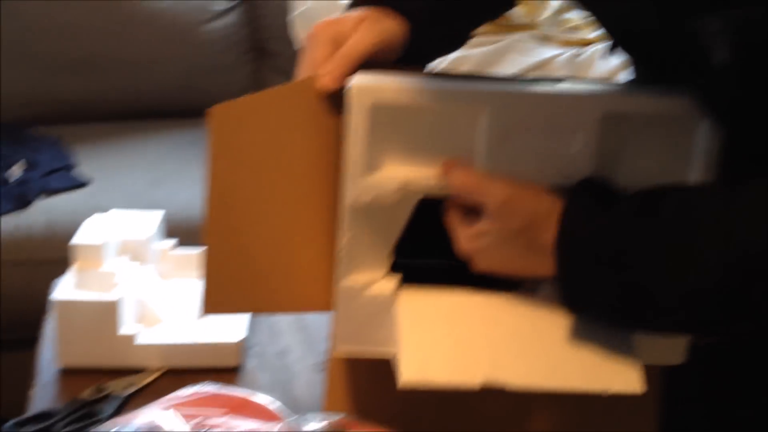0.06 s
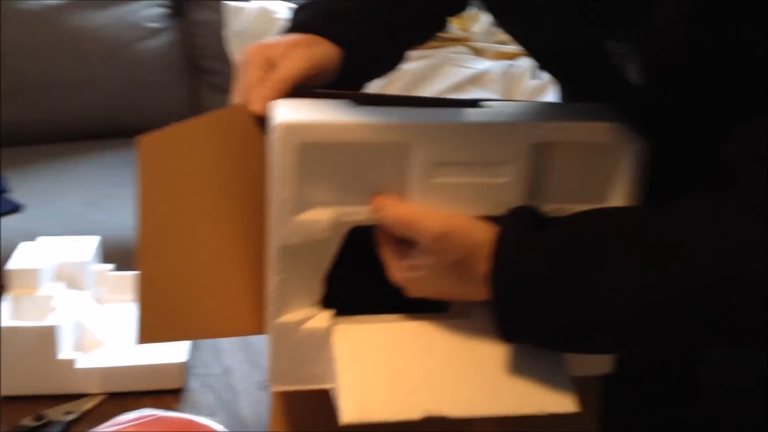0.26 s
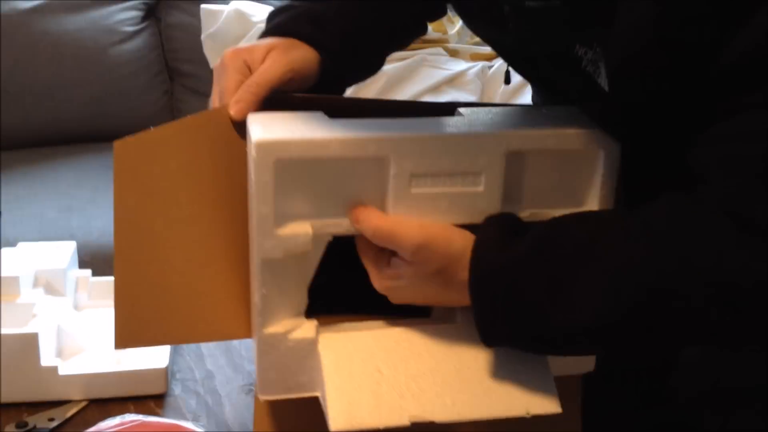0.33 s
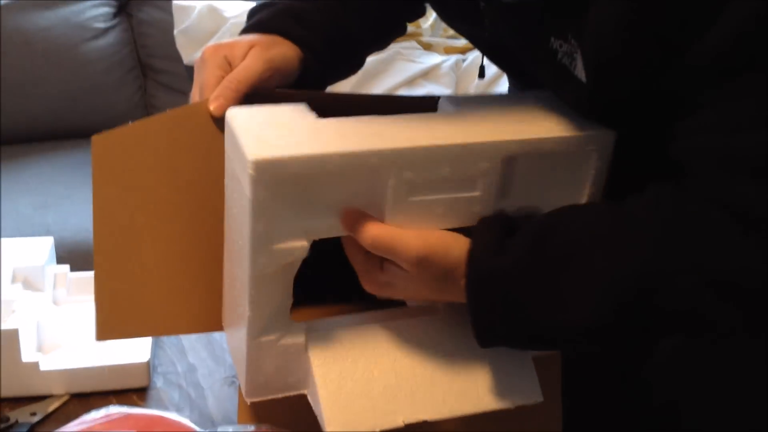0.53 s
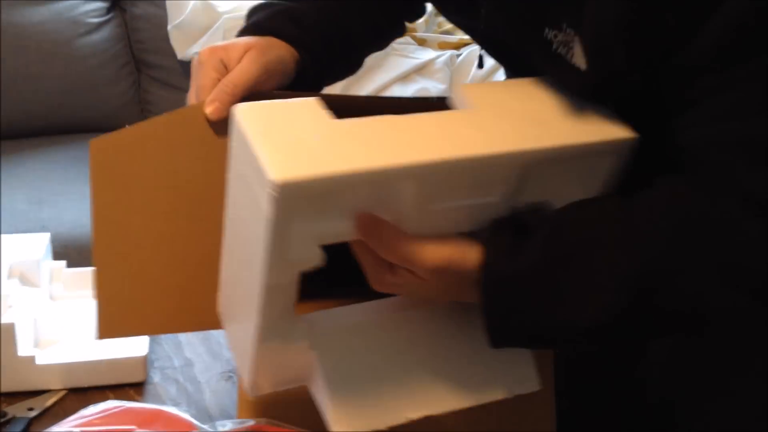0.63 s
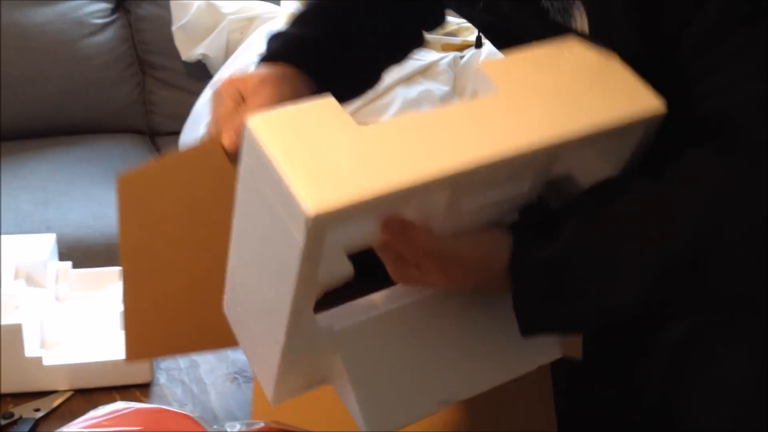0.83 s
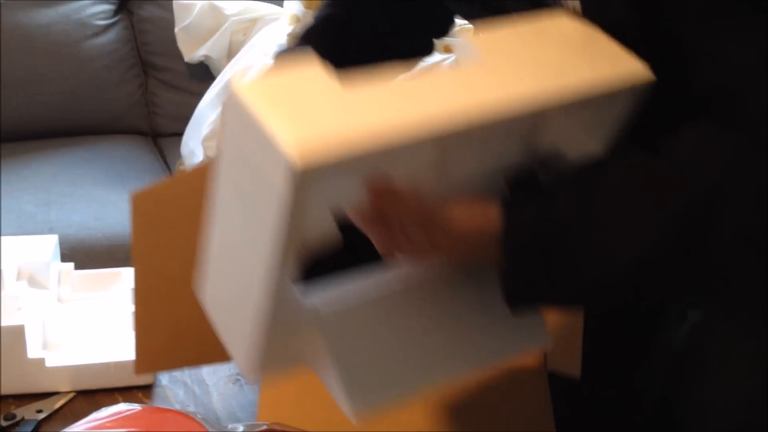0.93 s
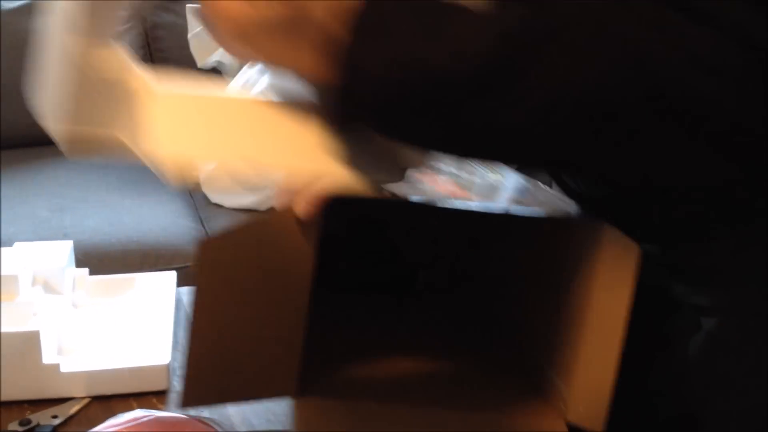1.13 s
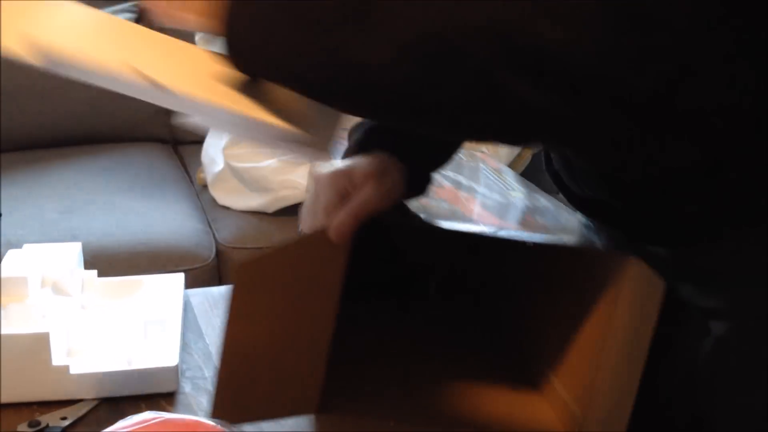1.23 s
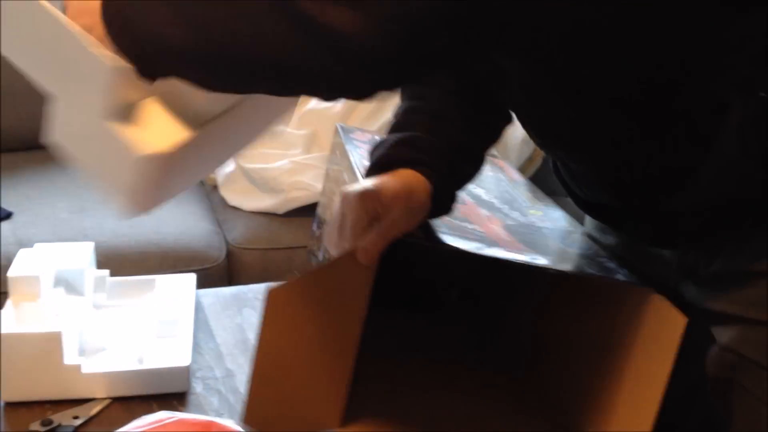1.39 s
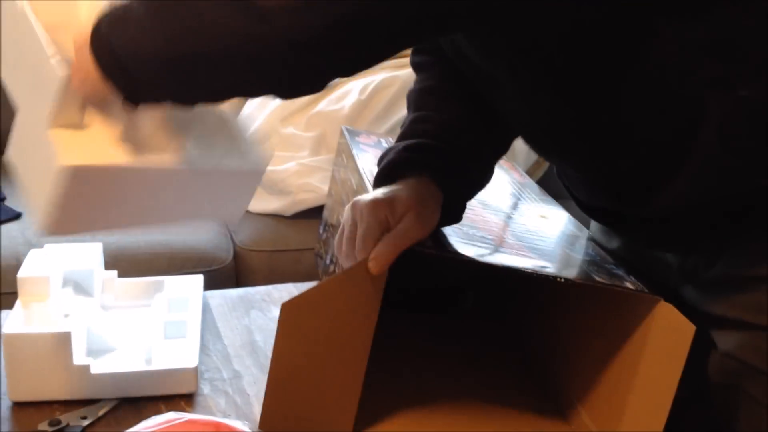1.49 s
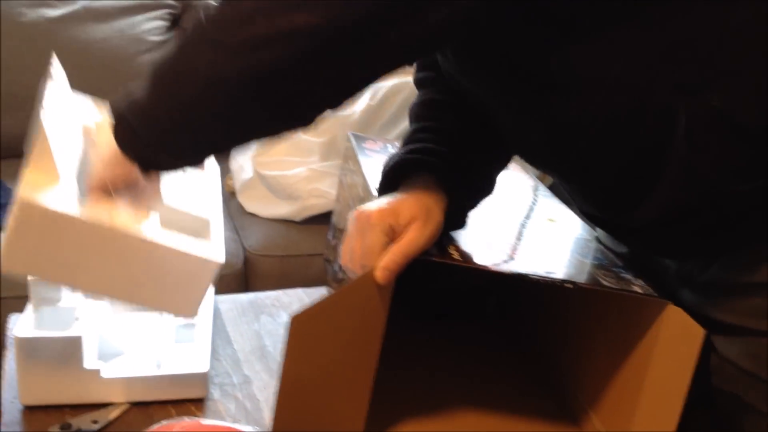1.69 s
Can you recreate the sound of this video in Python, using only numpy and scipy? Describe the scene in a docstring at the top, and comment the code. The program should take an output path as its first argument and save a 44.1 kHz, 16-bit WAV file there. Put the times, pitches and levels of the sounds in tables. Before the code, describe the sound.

Hollow knocks of moulded foam against a cardboard box: a brief soft rub, a sudden loud clack, a rapid uneven cluster, another strong knock, then faint scraping and light bumps, close in a furnished living room.

```python
"""Living room, close microphone: a moulded foam insert is worked out of a cardboard box.
It sticks and jerks free in hollow knocks, each a panel thump with box ring, a clack and a foam crack.
Between them foam slides on cardboard: grainy filtered noise, a fine hiss over a low rasp.
At the end the emptied box bumps twice. The knocks also excite a diffuse room tail."""
import sys
import numpy as np
from scipy import signal
from scipy.io import wavfile

SR = 44100
rng = np.random.default_rng(int(sys.argv[2]) if len(sys.argv) > 2 else 0)


def digitize_waveform(pressure):
    """Quantize a signal to 16-bit integers and store it at the path in sys.argv[1].

    Rows of a 2-D input are taken as channels; values are limited to [-1, 1].
    """
    field = np.atleast_2d(pressure).T
    bounded = np.clip(field, -1, 1)
    quanta = np.round(bounded * 32767).astype(np.int16)
    wavfile.write(sys.argv[1], SR, quanta)


N = 77175
T = np.arange(N) / SR

# Hiss of foam sliding on cardboard: time_s, level_db
HISS_LEVEL = [(0, -34.5), (.06, -37), (.085, -46), (.125, -48.5), (.17, -45.5), (.23, -52), (.46, -53.5),
              (.54, -45), (.605, -43.5), (.7, -51), (.79, -50), (.87, -45.5), (.91, -48.5), (1.02, -41.5),
              (1.075, -58.5), (1.11, -43.5), (1.24, -46.5), (1.31, -48), (1.345, -42), (1.40, -46),
              (1.48, -64), (1.62, -57), (1.665, -50.5), (1.72, -67.5), (1.75, -57)]
# Hiss spectrum: freq_hz, density_db_per_hz
HISS_SPECTRUM = [(1500, -4), (2500, -1), (3800, -9.5), (5500, -1), (7300, 1), (10000, -6), (12500, -3),
                 (14500, 2.5), (16000, -16.5)]
# Low rasp of the rubbed cardboard: time_s, level_db
RASP_LEVEL = [(0, -37.5), (.06, -48.5), (.11, -47), (.22, -48), (.45, -44), (.61, -37), (.75, -50),
              (.89, -49.5), (1.02, -46), (1.08, -52.5), (1.18, -48.5), (1.25, -51), (1.29, -41),
              (1.315, -55), (1.335, -39.5), (1.375, -43), (1.39, -34.5), (1.49, -48), (1.6, -45.5),
              (1.68, -47), (1.75, -52.5)]
# Rasp spectrum: freq_hz, density_db_per_hz
RASP_SPECTRUM = [(60, -56), (130, -5), (200, -5), (280, 7.5), (400, 5), (520, -7.5), (800, -1.5),
                 (2200, 0.5), (3300, -10), (6000, -18.5), (15000, -38)]
# Knocks: start_s, thump_db, thump_pitch_hz, thump_t60_s, box_ring_db, clack_db, wall_ring_hz, crack_db
KNOCKS = [ (0.157, -26.5, 229.5, 0.19, -35, -36.5, 710, -54),
          (0.174, -60, 239, 0.11, -32.5, -32, 1200, -61), (0.223, -43, 234, .1, -32.5, -39.5, 700, -71),
          (0.2396, -2.5, 245.2, 0.12, -17.5, -12, 1772, -15.5),
          (0.264, -11, 282.5, 0.16, -26.5, -16.5, 1440, -26.5),
          (0.274, -17, 129, .15, -30, -20.5, 1023, -32), (0.3474, -22, 301.3, 0.26, -39, -21.5, 792, -39),
          (0.358, -23.5, 270, 0.12, -26.5, -32.5, 670, -61), (0.395, -8, 261.7, 0.11, -26, -17.5, 583, -23),
          (0.416, -14.5, 387, 0.19, -20.5, -18.5, 756, -27.5),
          (0.436, -10, 279.3, 0.19, -29, -27.5, 830, -32), (0.485, -17, 287, 0.19, -41, -31.5, 1087, -41),
          (0.495, -19, 405.4, 0.08, -49, -27.5, 865, -46), (0.503, -18, 265, 0.13, -24, -35, 510, -52),
          (0.623, -17, 302, 0.12, -46, -30, 1100, -54), (0.635, -8, 306, 0.19, -17.5, -17, 1144, -18),
          (1.043, -26, 295, 0.11, -48.5, -35.5, 1140, -49), (1.196, -73, 266, 0.083, -67, -42, 825, -37.5),
          (1.289, -41.5, 422, 0.2, -68, -48, 1460, -58), (1.325, -40.5, 416, 0.31, -61, -46, 1510, -52),
          (1.412, -20, 191, 0.19, -30.5, -24, 882, -45), (1.427, -22, 293.3, 0.28, -54, -29, 765, -54),
          (1.462, -49, 280, 0.4, -36, -34.5, 2380, -43),
          (1.524, -27.5, 184.6, 0.091, -38.5, -31.5, 920, -64),
          (1.551, -23, 238.4, 0.15, -39.5, -36.5, 770, -70)]
# Ringing modes of box and insert: freq_hz, level_db, t60_s
BOX_MODES = [(117, -17.5, 0.15), (158.2, -22, 0.62), (186.6, -4.5, 0.27), (240.6, 0.5, 0.33),
             (279.1, 1.5, 0.27), (329, -2.5, 0.17), (392, -2.5, 0.19), (489.8, -14, 0.34), (737, -16, .13),
             (847, -27, 0.1), (1075, -16, 0.23), (1420, -21, .17), (1810, -13, 0.056)]
# Clack, dense panel modes: freq_hz, density_db_per_hz
CLACK_SPECTRUM = [(60, -30), (150, 4), (300, 13.5), (550, 3), (850, 7), (1400, -1), (2300, -0.5),
                  (3200, -17.5), (5000, -17.5), (15000, -44)]
# Crack, snap of the foam beads: freq_hz, density_db_per_hz
CRACK_SPECTRUM = [(100, -35), (500, -5), (2000, 15), (4000, 2.5), (6500, 4.5), (9000, -0.5), (12000, -9),
                  (15000, -6)]
# Room decay: freq_hz, t60_s
ROOM_T60 = [(100, 0.5), (300, .42), (800, 0.49), (2000, 0.2), (5000, 0.25), (12000, 0.12)]
# Room tail colour: freq_hz, level_db
ROOM_COLOUR = [(100, 2), (300, -5.5), (800, 0), (2000, 0.5), (5000, -1.5), (12000, -17)]

HISS_PATCHY_DB, HISS_GRAINS_PER_S, HISS_SMOOTH_SHARE = 1.8, 3400, 0.37
RASP_PATCHY_DB, RASP_GRAINS_PER_S, RASP_SMOOTH_SHARE = -0.5, 770, 0.48
PATCH_RATE_HZ, GRAIN_SPREAD_DB = 14, 2
THUMP_RISE_S, THUMP_LAG_S = 0.0013, 0.0012
PUFF_DB, PUFF_HZ, PUFF_T60_S = -9, 46.4, 0.042  # air pushed out of the box; dB re thump
CLACK_T60_S, CRACK_T60_S, CONTACT_RISE_S = 0.11, 0.073, 0.000071
SNAP_DB, SNAP_T60_S = -10, 0.0085  # extra bite at first touch; dB re burst
WALL_DB, WALL_T60_S = -1, 0.045  # struck patch of wall; dB re clack
ROOM_DB, ROOM_DELAY_S, ROOM_BUILD_S = -7.5, 0.0046, 0.0073
MIC_LOW_CUT_HZ, MIC_HIGH_CUT_HZ = 135, 15300

BAND_EDGES_HZ = np.geomspace(45, 17000, 25)
BAND_FILTERS = [
    (np.sqrt(low * high), signal.butter(2, [low, high], "band", fs=SR, output="sos"))
    for low, high in zip(BAND_EDGES_HZ, BAND_EDGES_HZ[1:])]


def from_db(db):
    """Decibels to gain."""
    return 10 ** (np.asarray(db) / 20)


def rms_one(x):
    """Scale to unit rms."""
    return x / np.sqrt(np.mean(x ** 2) + 1e-20)


def level(curve):
    """Gain per sample from (time_s, level_db) points."""
    return from_db(np.interp(T, *np.transpose(curve)))


def at_hz(points, hz):
    """Interpolate a table on a log-frequency axis."""
    freq_hz, value = np.transpose(points)
    return np.interp(np.log(hz), np.log(freq_hz), value)


def fade(t, t60_s):
    """Exponential decay, -60 dB at t60_s."""
    return np.exp(-np.log(1000) * t / t60_s)


def bands(draw):
    """Bands about a third octave wide, each from a fresh noise: (centre_hz, signal)."""
    for hz, sos in BAND_FILTERS:
        yield hz, signal.sosfilt(sos, draw())


def drift(rate_hz):
    """Slow random wander, rms 1: noise through a double real pole."""
    pole = np.exp(-2 * np.pi * rate_hz / SR)
    noise = rng.standard_normal(2 * N)
    wander = signal.lfilter([1], [1, -2 * pole, pole * pole], noise)
    return rms_one(wander[N:])  # settled half only


def friction(spectrum, patchy_db, grains_per_s, smooth_share):
    """Tiny slips of beads on a smooth hiss; the colour wanders as the contact moves; rms 1."""
    sizes = from_db(GRAIN_SPREAD_DB * np.minimum(rng.exponential(1, N), 5))
    slips = rms_one(sizes * (rng.random(N) < grains_per_s / SR))
    force = np.sqrt(smooth_share + (1 - smooth_share) * slips ** 2)  # shares of power
    total = np.zeros(N)
    for hz, band in bands(lambda: force * rng.standard_normal(N)):
        band_db = at_hz(spectrum, hz) + patchy_db * drift(PATCH_RATE_HZ)
        total += band * from_db(band_db)
    return rms_one(total)


def rubbing():
    """Sliding foam hisses; the cardboard rasps under it."""
    hiss = friction(HISS_SPECTRUM, HISS_PATCHY_DB, HISS_GRAINS_PER_S, HISS_SMOOTH_SHARE)
    rasp = friction(RASP_SPECTRUM, RASP_PATCHY_DB, RASP_GRAINS_PER_S, RASP_SMOOTH_SHARE)
    return level(HISS_LEVEL) * hiss + level(RASP_LEVEL) * rasp


def add(out, start_s, sound):
    """Mix a sound in at start_s, cut at the end of the scene."""
    start = int(start_s * SR)
    out[start:start + len(sound)] += sound[:N - start]


def ring(t, hz, t60_s):
    """One struck mode: decaying sine."""
    return np.sin(2 * np.pi * hz * t) * fade(t, t60_s)


def burst(t, spectrum, t60_s):
    """Countless close modes struck together: decaying noise, each band with its set share of energy."""
    shape = fade(t, t60_s) + from_db(SNAP_DB) * fade(t, SNAP_T60_S)
    shape = shape * (1 - np.exp(-t / CONTACT_RISE_S))
    total = np.zeros(len(t))
    for hz, band in bands(lambda: shape * rng.standard_normal(len(t))):
        # sqrt(hz): bandwidth grows with frequency, table is per Hz
        total += rms_one(band) * np.sqrt(hz) * from_db(at_hz(spectrum, hz))
    return rms_one(total) * np.sqrt(np.mean(shape ** 2))


def knocks():
    """Each jerk flexes a panel at its own pitch, rings the box and cracks the foam at the contact."""
    out = np.zeros(N)
    t = T[:SR // 8]
    late = np.maximum(T[:SR // 2] - THUMP_LAG_S, 0)  # thump and box lag the contact
    swell = 1 - np.exp(-late / THUMP_RISE_S)
    box = swell * sum(from_db(db) * ring(late, hz, t60_s) for hz, db, t60_s in BOX_MODES)
    puff = from_db(PUFF_DB) * ring(late, PUFF_HZ, PUFF_T60_S)
    for start_s, thump_db, pitch_hz, t60_s, box_db, clack_db, wall_hz, crack_db in KNOCKS:
        thump = swell * (ring(late, pitch_hz, t60_s) + puff)
        wall = from_db(WALL_DB) * ring(t, wall_hz, WALL_T60_S)
        clack = burst(t, CLACK_SPECTRUM, CLACK_T60_S) + wall
        crack = burst(t, CRACK_SPECTRUM, CRACK_T60_S)
        add(out, start_s, from_db(thump_db) * thump + from_db(box_db) * box)
        add(out, start_s, from_db(clack_db) * clack + from_db(crack_db) * crack)
    return out


def room(x):
    """Diffuse tail of a furnished room: noise bands with their own decays, the top dying soonest."""
    t = T[:SR // 2]
    tail = np.zeros(len(t))
    for hz, band in bands(lambda: rng.standard_normal(len(t))):
        tail += band * fade(t, at_hz(ROOM_T60, hz)) * from_db(at_hz(ROOM_COLOUR, hz))
    tail *= 1 - np.exp(-np.maximum(t - ROOM_DELAY_S, 0) / ROOM_BUILD_S)
    # scale by the decay energy at 1320 Hz
    reference = np.sqrt(np.sum(fade(t, at_hz(ROOM_T60, 1320)) ** 2) / 2)
    return from_db(ROOM_DB) * signal.fftconvolve(x, tail / reference)[:N]


def scene():
    """Knocks with their room tail, over dry rubbing."""
    rubbed = rubbing()
    hits = knocks()
    return (rubbed + hits + room(hits))[None]


def record(dry):
    """Small microphone: deep bass lost, loudest peaks rounded, top cut."""
    low_cut = signal.butter(2, MIC_LOW_CUT_HZ, "high", fs=SR, output="sos")
    high_cut = signal.ellip(10, 0.1, 70, MIC_HIGH_CUT_HZ, fs=SR, output="sos")
    thin = signal.sosfilt(low_cut, dry)
    rounded = thin / (1 + thin ** 6) ** (1 / 6)
    return signal.sosfilt(high_cut, rounded)


dry = scene()
out = record(dry)
digitize_waveform(out)
```